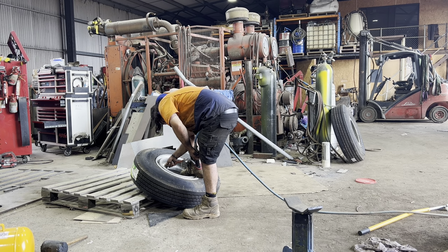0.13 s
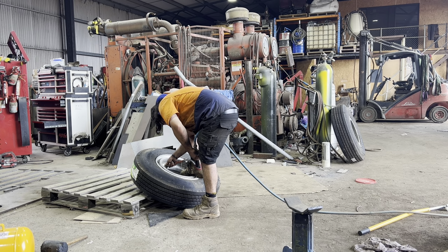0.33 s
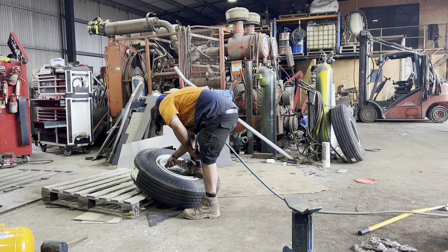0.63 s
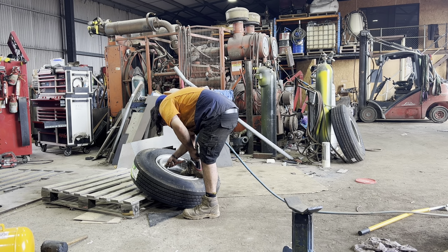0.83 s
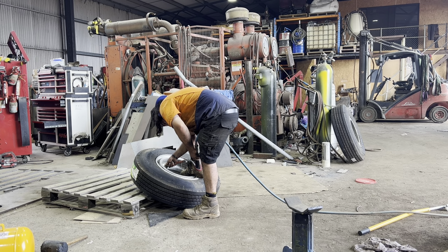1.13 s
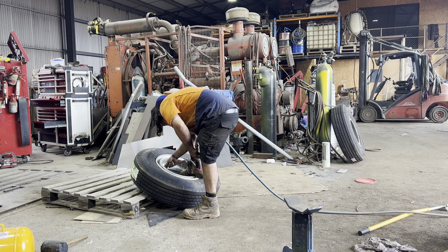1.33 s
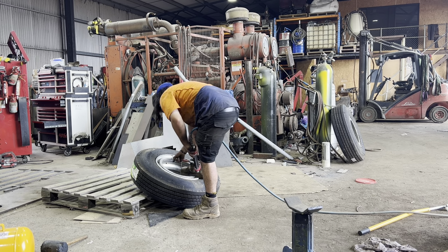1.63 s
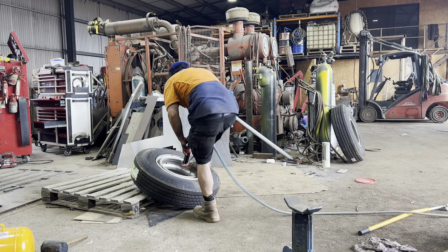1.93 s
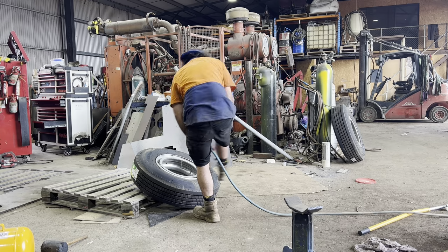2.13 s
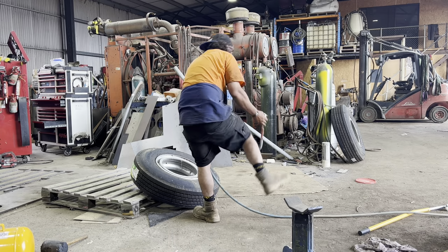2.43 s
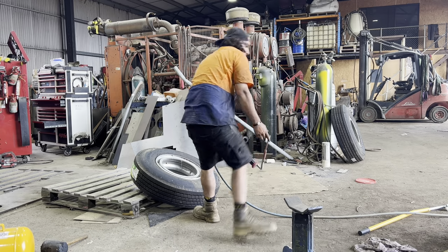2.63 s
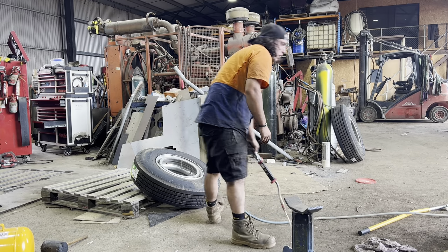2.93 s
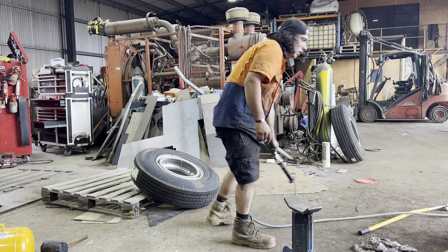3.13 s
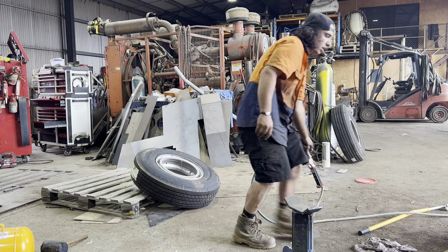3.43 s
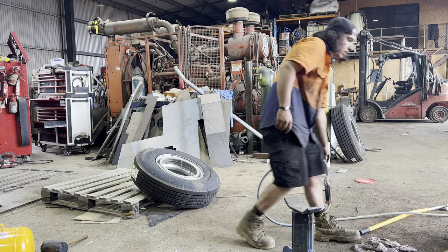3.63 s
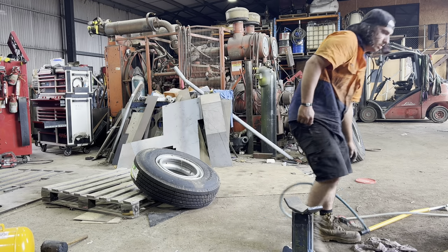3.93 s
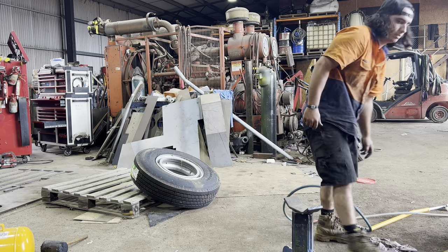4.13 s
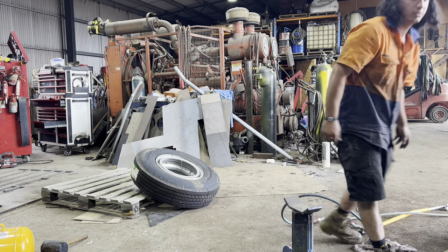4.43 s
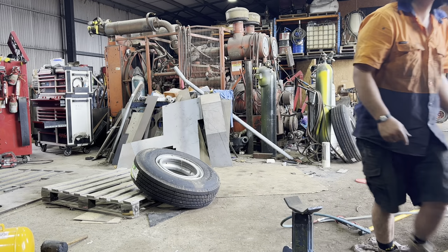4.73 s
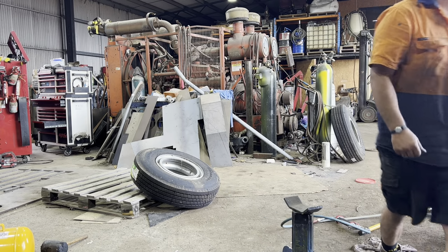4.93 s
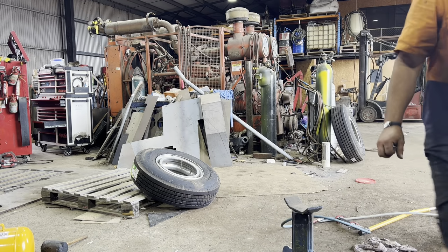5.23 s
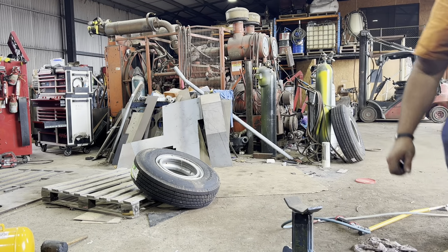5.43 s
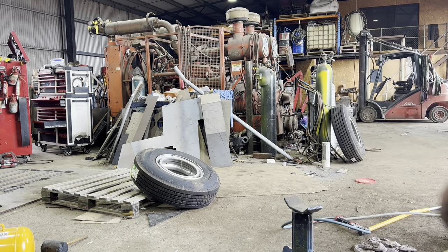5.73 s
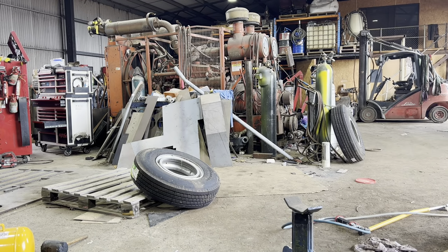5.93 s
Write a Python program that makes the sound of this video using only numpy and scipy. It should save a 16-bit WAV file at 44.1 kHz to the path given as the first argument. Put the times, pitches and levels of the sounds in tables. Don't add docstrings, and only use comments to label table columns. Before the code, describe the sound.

Heard from a few metres off in a reverberant workshop: faint steady rumble, a tiny metallic tick, then a loud clack and quick burst of escaping air. Small clicks lead to a dull ringing wheel knock and gritty rubbing. Heavy boots thud and scuff, with small chuck clicks between. A dropped air hose rings an iron bar, slaps the concrete, and the last steps scrape past.

```python
import sys
import numpy as np
from scipy import signal
from scipy.fft import rfft, irfft, next_fast_len
from scipy.io import wavfile
from scipy.ndimage import uniform_filter1d, minimum_filter1d

SR = 44100
rng = np.random.default_rng(int(sys.argv[2]) if len(sys.argv) > 2 else 0)


def ratio(d):
    e = np.asarray(d, float) / 20
    return 10 ** e


def inscribe(sig):
    pcm = np.round(np.clip(np.atleast_2d(sig).T, -1, 1) * 32767)
    wavfile.write(sys.argv[1], SR, pcm.astype(np.int16))


N = 267907

# (frequency [Hz], density [dB per Hz])
HUM_SPECTRUM = [(13, -40), (22, -6), (70, 0.5), (259, -19), (463, -29), (611, -31), (852, -35), (1290, -37),
                (4610, -46.5), (7190, -45.5), (9750, -52.5), (10600, -46), (14400, -41.5), (16500, -63)]

# (time [s], peak [dB], strongest [Hz], treble re peak [dB], shed answer re burst [dB])
TICKS = [(0.203, -40, 9700, 3, -6), (0.857, -33, 8770, 1, -1.5), (0.944, -23, 8550, 1, -4.5),
         (1.0184, -29, 9800, 1.5, -26), (2.12, -39, 4560, -11, 7.5), (2.375, -50, 3820, -3, -2),
         (2.554, -53, 3930, 3, -16), (2.674, -41.5, 4300, 7, -8), (2.79, -42.5, 3940, -8, 7.5),
         (2.847, -42.5, 4300, -20, -6), (2.941, -45, 4170, -5, -8), (2.705, -41, 3500, -20, -2),
         (3.2944, -42, 3640, -3, -5), (3.324, -43, 3920, -11, -14), (3.408, -42.5, 4230, -27, 5),
         (3.579, -31.5, 4700, -12, 4.5), (3.733, -39.5, 4600, 0, 1), (3.744, -35, 3770, -35.5, 2.5),
         (3.774, -40, 4220, 5, 1.5), (4.387, -42.5, 3980, -13, -5), (5.144, -43.5, 4600, 1, -11),
         (5.566, -53, 3820, -29, -18)]
KNOCKS = [
    (1.409, -29, 1490, -5, 2),
    (2.6405, -35, 1050, -21, 2),
    (2.693, -38.5, 1210, -10, 5),
    (2.9576, -23, 1070, -33, -2),
    (2.9592, -14, 1440, -10, -3.5),
    (3.4871, -28, 930, -18, -0.5),
    (3.504, -30, 1990, -12, 6.5),
    (3.933, -15.5, 1420, -7, -19),
    (4.854, -16.5, 1810, -19, -2.5),
    (5.9882, -41.5, 1500, -22, 2),
]
SCRAPES = [(0.5246, -11.5, 6110, -1, 0.5), (0.5867, -14, 7460, 8, -21), (1.4075, -16, 1294, -9.5, -0.5),
           (3.5438, -38, 2820, -14, -1), (3.632, -36, 3800, -9, -11), (3.8872, -42, 8300, -2, -29),
           (3.9408, -25.5, 1510, -13.5, 6.5), (4.8438, -34.5, 1210, -7, 4),
           (4.8756, -23.5, 4800, -10.5, -13), (4.8927, -31.5, 2190, -13, -35), (5.3768, -20, 2190, -19, 1),
           (5.394, -25.5, 2650, -14, -12), (5.4118, -21, 1600, -34, -22), (6.049, -39, 2500, -3, 2),
           (6.058, -36, 4970, -4, 8.5)]
SNAPS = [
    (1.111, -28.5, 4630, -8, -4.5),
    (1.248, -30.5, 4600, -8.5, -4.5),
    (2.959, -19, 3570, -51, -5),
    (4.639, -34.5, 1520, -1.5, -10.5),
]
# (ping [dB], length [s])
CONTACT_KINDS = [
    (-3, 0.0059),
    (-2, .006),
    (-8, .017),
    (6.5, 0.0078),
]

# (time [s], level [dB], shed answer re ring [dB])
RINGS = [
    (3.934, -33, 4),
    (1.408, -27.5, 3.5),
    (.526, -41, -5),
    (0.52, -41.5, 10.5),
    (.203, -58, -4),
    (2.121, -58.5, -1.5),
    (2.96, -43, 7),
]
# (frequency [Hz], level [dB], t60 [s])
BAR_MODES = [(975, -10, .15), (1573, 0, .3), (2313, -1, .22), (3166, -4, .26), (3781, -13, .2),
             (4099, -2, .3), (4883, -10, .2), (7381, -14, .15)]
RIM_MODES = [(269, 4.5, 0.061), (455.5, 1.5, 0.094), (660, -8, 0.093), (846, 0.5, 0.064), (1016, -1, 0.048),
             (1210, -6, 0.069)]
CHUCK_MODES = [(4813, -1, .1), (6128, -4, .1), (6794, -1, 0.09), (7550, -13, 0.11), (7760, -3, 0.13),
               (8360, -4, .13), (8516, 5, .14), (8700, 1, .1), (9900, -5, 0.15), (9736, -5, 0.091),
               (10200, 10, 0.046), (12050, -8, .07), (12900, -5, .07), (13650, -10, .07)]
CLIP_MODES = [(3340, -3, .04), (3560, 0, 0.057), (4540, -8, .04)]

# (time [s], peak [dB], pitch [Hz], upper body re peak [dB], shed answer re thud [dB])
THUDS = [(0.5243, -31, 429, -2, -12), (0.593, -36, 381, 5, -16), (1.404, -20, 237, 4.5, -3),
         (1.41, -29, 105, -14, -10), (2.169, -48, 80, 33, -17), (2.64, -26.5, 148, -25, -3),
         (2.641, -30, 288, -25, -8), (2.954, -34.5, 330, -12, -14), (3.488, -34.5, 147, -1, 6),
         (3.93, -21.5, 274, -0.5, -2), (4.242, -38, 110, -22, -25), (4.681, -40.5, 269, 0, -26),
         (4.844, -31.5, 126, -3, 7), (4.985, -39, 147, -15.5, -21), (5.209, -40.5, 82, -11, -18),
         (5.378, -23, 136, -16, -3), (5.398, -24.5, 366, -4.5, 0), (5.593, -31.5, 261, -35, -14),
         (6.051, -37, 390, -6, 11)]

# (frequency [Hz], density [dB per Hz])
JET_SPECTRUM = [(500, -10), (900, -16.5), (2900, -25), (3500, -6), (8200, 6), (11000, -3), (14200, -1.5),
                (15900, -10), (16500, -53)]
GRIT_SPECTRUM = [(1200, -13), (2800, -1.5), (3700, 3), (4800, 4), (6000, -5), (12000, -23), (16000, -35)]
SAND_SPECTRUM = [(2500, -18), (5500, 4), (8000, 5), (13000, -4.5), (16000, -15)]
RUBBER_SPECTRUM = [(150, -4), (350, -0.5), (800, -3), (1800, -7.5), (3500, -27.5)]
# (start [s], hold [s], level [dB], decay [dB/s], fine sand re grit [dB])
DRAGS = [
    (1.024, 0.34, -59, 197, -22),
    (1.43, .33, -55, 62, -5.5),
    (2.637, 0.054, -61, 36, -2),
    (2.933, 0.29, -61.5, 37, -5),
    (3.488, .03, -51, 60, -9),
    (3.932, 0.031, -39, 57, -35),
    (4.89, 0.21, -69, 42, -1.5),
    (5.408, 0.018, -52.5, 41, -7),
]
# (start [s], hold [s], level [dB], decay [dB/s])
RUBS = [
    (1.02, 0.39, -64.5, 56),
    (1.503, 0.27, -45.5, 80),
    (1.947, 0.41, -64.5, 20),
    (2.653, 0.26, -57.5, 60),
    (2.963, 0.008, -48.5, 36),
    (3.52, 0.24, -58, 30),
    (3.956, 0.16, -51, 40),
    (4.622, 0.54, -60, 25),
    (5.472, 0.069, -58, 31),
]

# (frequency [Hz], t60 [s])
SHED_T60 = [(100, 1.38), (500, 1.17), (2000, 1.25), (6000, 1.12), (14000, 0.58)]
# (frequency [Hz], correlation [-1..1])
LIKENESS = [(60, 0.97), (150, .94), (380, 0.74), (800, 0.2), (1500, 0.15), (2300, 0.32), (4500, 0.55),
            (9000, 0), (13000, 0.074)]

# (frequency [Hz], gain [dB])
OPENING_FILTER = [(25, -20), (50, -29), (80, -7.5), (130, 4), (400, 6.5), (1500, 4.5), (3200, 1.5),
                  (4700, -6.5), (7000, -2.5), (14000, -1.5)]
# (frequency [Hz], left minus right [dB])
PORT_LEAN = [(60, 1.5), (250, .5), (600, 0.5), (1300, 0), (2600, 2), (6000, 3), (10000, -0.5), (14000, 1.5)]
# (from [Hz], to [Hz])
GATED_BANDS = [
    [(9150, 10900), (15000, 22050)],
    [(6850, 7400), (11800, 13600), (15800, 22050)],
]

FILTER_OFF_S = 1.035
CHUCK_PING_HZ = 8140


def unit(x):
    return x / np.sqrt(np.mean(x ** 2) + 1e-20)


def along(points, hz):
    f, v = np.transpose(points)
    return np.interp(np.log(hz + 1), np.log(f + 1), v)


def filtered(x, response):
    m = next_fast_len(x.shape[-1] + 4096)
    spectrum = rfft(x, m) * response(np.fft.rfftfreq(m, 1 / SR))
    return irfft(spectrum, m)[..., :x.shape[-1]]


def rush(spectrum, patchy_db):
    z = signal.stft(rng.standard_normal((2, N)), nperseg=512)[2]
    patches = uniform_filter1d(rng.standard_normal(z.shape[1:]), size=5, axis=0)
    patches = uniform_filter1d(patches, size=10, axis=1)
    pair = signal.istft(z * ratio(patchy_db * unit(patches)), nperseg=512)[1][:, :N]
    return unit(filtered(pair, lambda hz: ratio(along(spectrum, hz))))


def stroke(start_s, hold_s, db, decay_db_per_s, rise_s):
    t = np.arange(N) / SR - start_s
    fall_db = decay_db_per_s * np.clip(t - rise_s - hold_s, 0, None)
    return np.clip(t / rise_s, 0, 1) * ratio(db - fall_db)


def shed_tail(gap_s, early_db, colour):
    hz = np.fft.rfftfreq(1024, 1 / SR)
    t = np.arange(SR // 512) * 512 / SR
    z = rng.standard_normal((2, len(hz), len(t), 2)) @ np.array([1, 1j])
    late = ratio(-60 * t / along(SHED_T60, hz)[:, None])
    early = 1 + ratio(early_db - 60 * t / 0.8)
    tail = signal.istft(z * late * early * colour(hz)[:, None], SR, nperseg=1024)[1]
    tail = tail * np.clip(np.arange(tail.shape[1]) / SR / gap_s - 0.5, 0, 1)
    return tail / np.linalg.norm(tail[0])


def echo(sound, colour, wet_db):
    return ratio(wet_db) * np.linalg.norm(sound) * shed_tail(gap_s=0.0062, early_db=7, colour=colour)


def add(out, s, sound, answer):
    part = out[:, round(s * SR):]
    part[:, :answer.shape[1]] += answer[:, :part.shape[1]]
    part[:, :len(sound)] += (sound * np.array([[1], [0.1]]))[:, :part.shape[1]]


def hum():
    return ratio(-46.5) * rush(HUM_SPECTRUM, patchy_db=1.5)


def cracks():
    out, t = np.zeros((2, N)), np.arange(SR // 8) / SR
    for table, (ping_db, length_s) in zip((TICKS, KNOCKS, SCRAPES, SNAPS), CONTACT_KINDS):
        for s, db, hz, treble_db, wet_db in table:
            broad = [(300, -7), (900, -11), (3500, -11.5), (7000, treble_db - 1.5),
                     (12500, treble_db - 4.5), (15500, treble_db - 6), (17000, -70)]
            colour = lambda f: ratio(along(broad, f)) + 0.35 * np.exp(-(np.log2((f + 1) / hz) / 0.45) ** 2)
            burst = unit(filtered(rng.standard_normal(len(t)), colour))
            chuck_hz = CHUCK_PING_HZ * rng.normal(1, 0.014)
            chuck = 0.97 * ratio(treble_db) * np.sin(2 * np.pi * chuck_hz * t)
            ping = ratio(ping_db - 26 * t / 0.01) * (np.sin(2 * np.pi * hz * t) + chuck)
            envelope = (1 - np.exp(-t / 0.0011)) * ratio(-26 * t / length_s)
            sound = ratio(db + 2) * (0.54 * burst + ping) * envelope
            add(out, s - 0.001, sound, echo(sound, colour, wet_db))
    return out


def rings():
    out, t = np.zeros((2, N)), np.arange(SR) / SR
    parts = (BAR_MODES, RIM_MODES, CHUCK_MODES, CHUCK_MODES, CHUCK_MODES[7:11], CHUCK_MODES[5:], CLIP_MODES)
    for (s, db, wet_db), modes in zip(RINGS, parts):
        ring = sum(ratio(level - 60 * t / t60) * np.sin(2 * np.pi * hz * t) for hz, level, t60 in modes)
        ring = ratio(db) * ring * (1 - np.exp(-t / 0.0032))
        tail = shed_tail(gap_s=0.021, early_db=3.5, colour=np.ones_like)
        add(out, s, ring, ratio(wet_db) * signal.fftconvolve(ring[None], tail, axes=1))
    return out


def thuds():
    out, t = np.zeros((2, N)), np.arange(SR // 3) / SR
    for s, db, hz, upper_db, wet_db in THUDS:
        t60_s = 0.074 * (hz / 200) ** 0.1
        push = np.sin(2 * np.pi * hz * (t + 0.0011 * (1 - np.exp(-t / 0.013))))
        body = [(50, 5.5), (110, 0), (350, -4), (700, upper_db - 6), (1400, upper_db - 15), (3000, -62)]
        colour = lambda f: ratio(along(body, f))
        noted = lambda f: colour(f) + 0.94 * np.exp(-((f - hz) / 60) ** 2)
        puff = unit(filtered(rng.standard_normal(len(t)), colour))
        envelope = (1 - np.exp(-t / 0.0013)) * ratio(-60 * t / t60_s)
        sound = ratio(db) * (0.95 * push + 0.83 * puff) * envelope
        add(out, s, sound, echo(sound, noted, wet_db))
    return signal.sosfilt(signal.butter(2, 90, "high", fs=SR, output="sos"), out)


def valve():
    gain = stroke(start_s=0.525, hold_s=0.081, db=-27.5, decay_db_per_s=129, rise_s=0.0088)
    return gain * rush(JET_SPECTRUM, patchy_db=2.5)


def scuffs():
    drags = [stroke(s, hold, db, decay, rise_s=0.005) for s, hold, db, decay, _ in DRAGS]
    grit_gain = sum(drags)
    sand_gain = sum(ratio(row[-1]) * drag for row, drag in zip(DRAGS, drags))
    rubber_gain = sum(stroke(*row, rise_s=0.02) for row in RUBS)
    grain_db = 2 * np.minimum(rng.exponential(size=N // 64 + 1), 4)
    grains = np.repeat(ratio(grain_db), 64)[:N]
    grains = uniform_filter1d(grains, size=48)
    grit = grit_gain * unit(grains * rush(GRIT_SPECTRUM, patchy_db=2.5))
    sand = sand_gain * unit(grains * rush(SAND_SPECTRUM, patchy_db=2))
    return grit + sand + rubber_gain * rush(RUBBER_SPECTRUM, patchy_db=2)


def wide(pair):
    turn = lambda hz: np.arccos(np.clip(along(LIKENESS, hz), -1, 1)) / 2
    mid, side = filtered(pair, lambda hz: np.array([np.cos(turn(hz)), np.sin(turn(hz))]))
    return np.array([mid + side, mid - side])


def scene():
    return wide(hum() + cracks() + rings() + thuds() + valve() + scuffs())


def gate_treble(x):
    pair = np.array([x[0] + x[1], x[0] - x[1]]) / 2
    inside = lambda hz, row: sum(1.0 * (hz > lo) * (hz < hi) for lo, hi in row)
    late = filtered(pair, lambda hz: np.array([inside(hz, row) for row in GATED_BANDS]))
    early = filtered(pair, lambda hz: np.array([[0], [1]]) * (hz > 13200))
    bands = np.where(np.arange(N) / SR < FILTER_OFF_S, early, late)
    treble = filtered(pair[0], lambda hz: hz > 9000)
    power = np.abs(uniform_filter1d(treble ** 2, size=128))
    before = np.roll(np.abs(uniform_filter1d(power, size=1024)), 640)
    attack = -minimum_filter1d(-1.0 * (power > 7 * before), size=300)
    mid, side = pair - bands * (1 - uniform_filter1d(attack, size=256))
    return np.array([mid + side, mid - side])


def top_cut(x):
    return signal.sosfilt(signal.butter(12, 16670, fs=SR, output="sos"), x)


def record(dry):
    acting = np.clip((FILTER_OFF_S - np.arange(N) / SR) / 0.02, 0, 1)
    dulled = filtered(dry, lambda hz: ratio(along(OPENING_FILTER, hz)))
    heard = acting * dulled + (1 - acting) * dry
    lean = lambda hz: ratio(along(PORT_LEAN, hz) * np.array([[0.5], [-0.5]]))
    passband = lambda hz: hz ** 2 / (hz ** 2 + 48 ** 2) * (hz < 16600)
    ports = filtered(heard, lambda hz: lean(hz) * passband(hz))
    mix = gate_treble(ports)
    return top_cut(mix)


dry = scene()
out = record(dry)
inscribe(out)
```